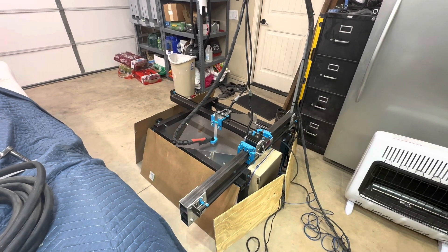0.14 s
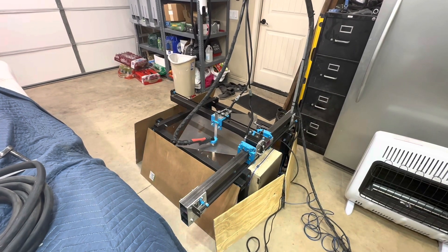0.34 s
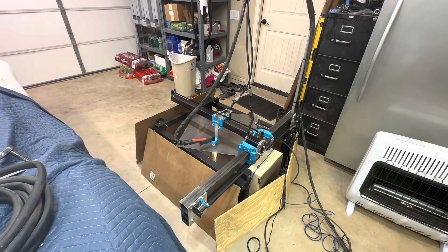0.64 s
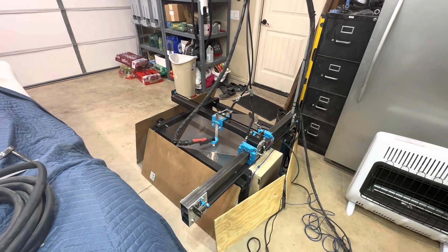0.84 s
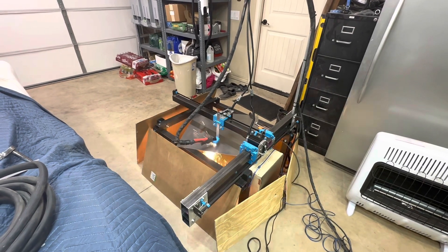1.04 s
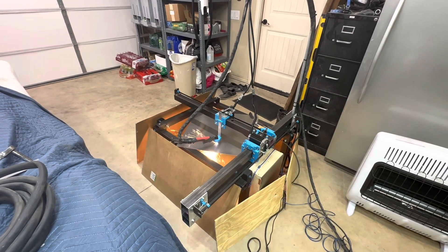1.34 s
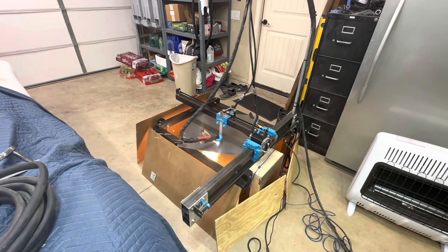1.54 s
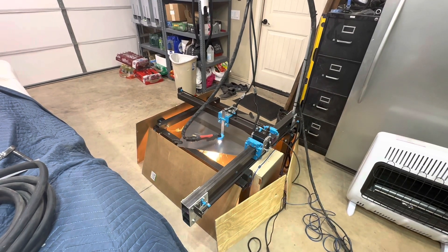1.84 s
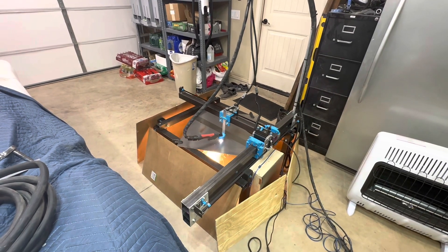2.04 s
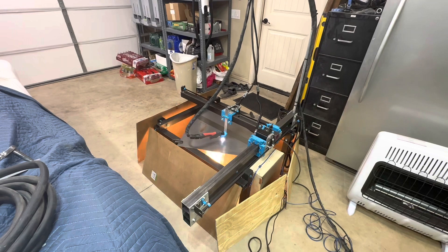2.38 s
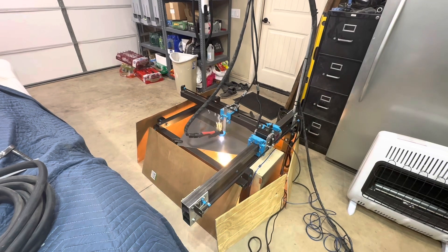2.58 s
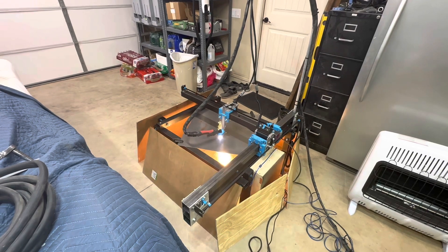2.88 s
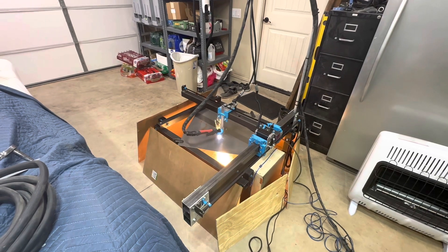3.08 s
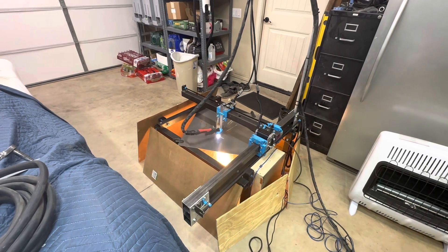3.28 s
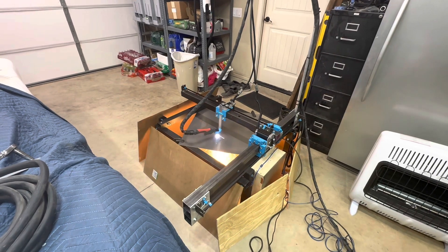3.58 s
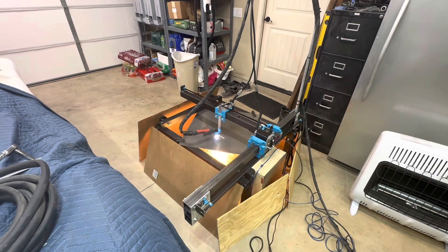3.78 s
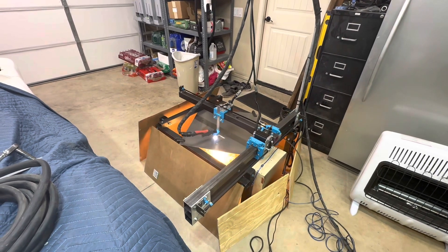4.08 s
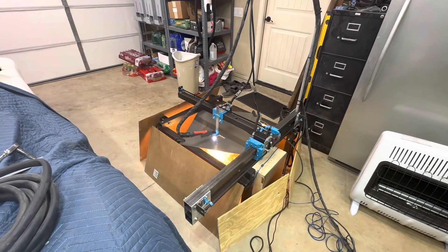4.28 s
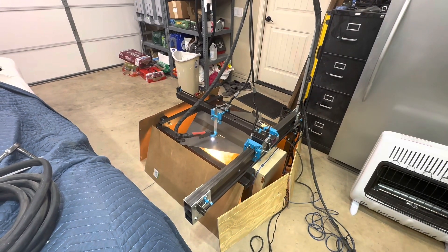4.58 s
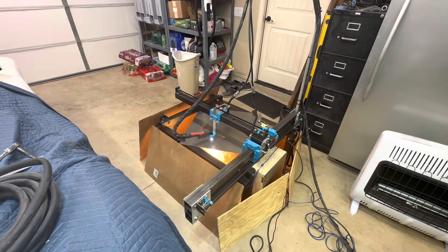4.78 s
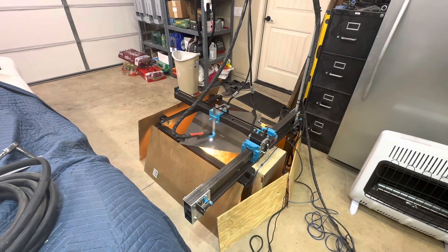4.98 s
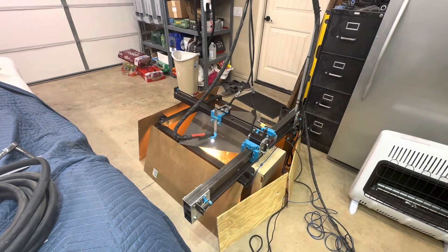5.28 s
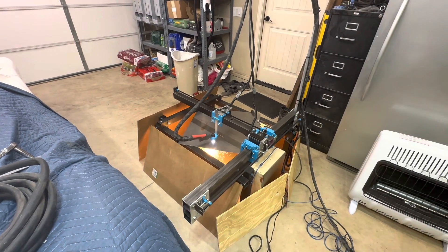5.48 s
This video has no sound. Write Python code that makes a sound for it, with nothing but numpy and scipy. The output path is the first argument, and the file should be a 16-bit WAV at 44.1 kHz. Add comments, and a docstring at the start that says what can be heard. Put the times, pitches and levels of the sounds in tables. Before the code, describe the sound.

In a hard garage, a plasma torch starts with a dull valve thud and a sharp burst of air sinking in pitch. Almost at once a loud, rough, high screech breaks out, slipping and throbbing, then drops and crumbles away within the first second. A broad, bright, steady hiss continues until the end, with faint fan hum below. Stereo microphone a few steps away.

```python
"""A thud and a rush of air, a harsh slipping screech, then a broad steady hiss: a plasma torch in a garage.
The hiss is random short-time spectra shaped in pitch and time; the screech is a tone whose pitch keeps
slipping, with its octave, as the jet meets the whole sheet. The opening valve rings low room modes and sends
noise through the sinking resonance of the hose. The power supply's fan hums underneath as wavering tones.
Two microphone ports hear the hard room, each with its own echoes of the screech."""
import sys
import numpy as np
from scipy import signal
from scipy.fft import rfft, irfft
from scipy.io import wavfile
from scipy.ndimage import uniform_filter1d

SR = 44100
rng = np.random.default_rng(int(sys.argv[2]) if len(sys.argv) > 2 else 0)


def wav_record(signal):
    """Record a signal, one row per channel, as 16-bit PCM in the file named by sys.argv[1]."""
    frames = np.transpose(np.atleast_2d(signal))
    bounded = np.clip(frames, -1, 1)
    # unit amplitude maps onto the largest positive 16-bit level
    quanta = np.round(bounded * 32767).astype(np.int16)
    wavfile.write(sys.argv[1], SR, quanta)


N = 248283

# Relative colour of the air noise, low to middle: pitch_hz, density_db [Hz, dB per Hz]
HISS_COLOUR = [(40, -26), (56, -10.5), (120, -15), (200, -16.5), (360, -12), (450, -19), (485, -6),
               (520, -8), (580, -8.5), (660, -7), (800, -4), (1000, -2), (1400, -0.5), (3100, 0),
               (4600, -0.1), (5000, -1.3), (5350, 0.5), (5900, 2), (6200, 0.7), (6600, -2.6), (7100, -4),
               (8500, -1.5)]
# The same colour, continued to the top: pitch_hz, density_db [Hz, dB per Hz]
TOP_COLOUR = [(9400, -2), (10200, -4), (10900, -.5), (11600, -2.5), (13200, -5.5), (15000, -2.5),
              (16500, -4)]
# Balance of left and right: pitch_hz, left_minus_right_db [Hz, dB]
SIDE_BALANCE = [(60, 0), (250, -1), (1000, 0), (3200, 0), (3800, -2), (4450, -1.5), (5100, 2), (6400, 3.5),
                (7600, 2), (8500, -1), (9400, -5), (10350, 0)]
# Left-right likeness of the hiss over pitch: alike in the bass, opposite near 11 kHz, alike again above:
# pitch_hz, likeness [Hz, -1 to 1]
LEFT_RIGHT_LIKENESS = [(60, .95), (150, .88), (270, .8), (400, .6), (700, .3), (900, .05), (3900, .15),
                       (4900, -.1), (5500, .1), (7700, .25), (9000, -.2), (9800, .2), (10250, -.3),
                       (10450, -1), (12300, -1), (12500, -.5), (12900, .1), (13400, .9), (13900, 1),
                       (15200, .98), (15800, .7)]
# Phase by which one side leads in the bass: pitch_hz, lead_rad [Hz, radians]
SIDE_LEAD = [(130, 0), (260, .3), (520, 1.2), (700, .3)]
ADDED_LIKENESS = .36  # most that is added between left and right, at a random phase for each pitch
SHIFT_S = 1.1  # standing waves change over this time
HOP = 128  # samples between short-time spectra


def jet():
    """Turbulent air: random short-time spectra with patches, broad flutter and the ripple of room modes."""
    frames = N // HOP + 5
    starts = np.arange(frames) * HOP
    t = starts / SR
    f = np.fft.rfftfreq(512, 1 / SR)[:, None]
    a, b, c, d, patches = rng.standard_normal((frames, 257, 5)).T
    left, other = a + 1j * b, c + 1j * d
    patches = uniform_filter1d(patches, size=10, axis=0)
    patches = evened(uniform_filter1d(patches, size=16, axis=1))
    flutter = wander(42)[np.minimum(starts, N - 1)]
    level_db = jet_level(t, f)
    early = np.exp(-t / 0.32)  # the first blast is patchier
    level_db += (1.14 + 1.1 * early) * patches
    level_db += 0.42 * flutter * read([(1000, 0.26), (4000, 0.75)], f)

    same = read(LEFT_RIGHT_LIKENESS, f)
    start, drift = rng.random((len(f), 2, 1)).transpose(1, 0, 2)
    turns = start + (drift - .5) * t / (2 * SHIFT_S)  # the random phase between left and right drifts slowly
    added = ADDED_LIKENESS * (1 - same ** 2) ** 2 * np.exp(2j * np.pi * turns)
    same = same * np.exp(1j * read(SIDE_LEAD, f) * (f < 900)) + added
    right = same * left + np.sqrt(np.maximum(1 - abs(same) ** 2, 0)) * other
    balance_db = np.multiply.outer([.5, -.5], read(SIDE_BALANCE, f))
    spectra = np.array([left, right]) * gain_of(level_db + balance_db)
    sound = signal.istft(spectra, nperseg=512, noverlap=512 - HOP)[1][:, :N]

    fine = np.fft.rfftfreq(N, 1 / SR)
    depth_db = read([(60, 1.1), (400, 3.5), (900, 2.5), (1300, 5.1), (3000, 3.34), (16000, 3.94)], fine)
    coloured = rfft(sound) * gain_of(read(HISS_COLOUR + TOP_COLOUR, fine) - 11.0)
    out = 0
    # standing waves shift: each ripple pattern fades into the next
    for k, ripple in enumerate(rng.standard_normal((7, 1400))):
        ripple_db = depth_db * np.interp(fine, np.arange(1400) * 12., ripple)
        fade = np.maximum(1 - abs(np.arange(N) / SR / SHIFT_S - k), 0)
        out = out + fade * irfft(coloured * gain_of(ripple_db), N)
    return out


# Steady air jet, before its colour: time_s, level_db, added_top_db [s, dB, dB]
STEADY_JET = [(0.03, -37, 11.5), (0.35, -31, 1), (0.62, -33.5, -0.5), (0.75, -33, -1.5), (1.2, -34, -0.5),
              (2.0, -32.5, -1), (2.85, -33, 2), (3.4, -33, 0.5), (4.2, -31.5, -0.5), (4.88, -32.5, -1),
              (5.1, -31.5, -1), (5.63, -31.5, -2)]
# Where the added body applies: pitch_hz, share [Hz, 0 to 1]
BODY_SHARE = [(700, 1), (1000, 0.71), (3500, 0.61), (5200, 0.03)]
BODY_DB, BODY_DIPS = -5, 0.34  # added body, and the share of the background's dip that it follows
# Where the added top applies: pitch_hz, share [Hz, 0 to 1]
TREBLE_SHARE = [(9000, 0.058), (12000, 1)]
# First blast of stored air, before its colour: pitch_hz, level_db, held_until_s [Hz, dB, s]
FIRST_BLAST = [(910, -31, 0.12), (1190, -31, 0.16), (2020, -20.5, 0.05), (2700, -26, 0.076),
               (3600, -23, 0.15), (5000, -23, 0.13), (8700, -26, 0.21), (13000, -29, 0.1)]
BLAST_RISE_S, BLAST_FALL_DB_PER_S = 0.037, 90  # the rise runs on this long after the valve is open
VALVE_S, OPEN_DB_PER_S = 0.0225, 2300  # the air swells at this rate until the valve is open
# Bands of the piercing puff, before its colour: centre_hz, width_hz, level_db [Hz, Hz, dB]
PUFF_BANDS = [(5450, 550, -33), (9000, 2000, -35)]
PUFF_S, PUFF_SPREAD_S = 0.865, 0.081  # its middle, and the time to either side
# Share of the low background wash in the sound: pitch_hz, share [Hz, 0 to 1]
WASH_SHARE = [(700, 0.83), (1000, 0.065)]
WASH_DB = -35.5
# How far the wash follows the background's dip: pitch_hz, share [Hz, 0 to 1]
WASH_DIP_SHARE = [(250, 0.99), (500, 0.62), (800, 0.32)]
# Swell of hum and wash, dipping after the loud start: time_s, level_db [s, dB]
BACKGROUND_SWELL = [(0, 10), (0.2, 6), (0.75, -1), (1.5, -0.5), (2.5, 2), (5.63, 2)]


def jet_level(t, f):
    """dB over pitch and time: steady jet, first blast and piercing puff above the low wash."""
    hiss_db, top_db = played(STEADY_JET, t)
    dip_db, = played(BACKGROUND_SWELL, t)
    body_db = read(BODY_SHARE, f) * (BODY_DB + BODY_DIPS * dip_db)
    steady_db = hiss_db + body_db + read(TREBLE_SHARE, f) * top_db

    hz, blast_db, held_s = np.transpose(FIRST_BLAST)
    falling_s = np.maximum(t - np.interp(f, hz, held_s), 0)
    surge_db = np.interp(f, hz, blast_db) - BLAST_FALL_DB_PER_S * falling_s
    rise = np.clip(t / (VALVE_S + BLAST_RISE_S), 0, 1)

    bands = sum(gain_of(2 * db) * np.exp(-((f - mid_hz) / width) ** 2) for mid_hz, width, db in PUFF_BANDS)
    puff = np.exp(-((t - PUFF_S) / PUFF_SPREAD_S) ** 2) * bands

    power = gain_of(2 * steady_db) + rise * gain_of(2 * surge_db) + puff
    air_db = 10 * np.log10(power) - OPEN_DB_PER_S * np.maximum(VALVE_S - t, 0)
    wash = np.clip(read(WASH_SHARE, f), 0, 1)
    wash_db = WASH_DB + read(WASH_DIP_SHARE, f) * dip_db
    return wash * wash_db + (1 - wash) * air_db


# Screech of the jet on the sheet, calm and rough by turns: time_s, upper_pitch_hz, slip_hz [s, Hz, Hz]
SCREECH_PITCH = [(0.15, 5060, 110), (0.21, 5020, 130), (0.222, 5130, 450), (0.26, 5100, 700),
                 (0.29, 5050, 900), (0.315, 4760, 190), (0.4, 4770, 240), (0.41, 4720, 120),
                 (0.428, 4720, 140), (0.445, 4860, 640), (0.55, 4900, 820), (0.65, 4920, 800),
                 (0.7, 5000, 900), (0.8, 4900, 900)]
# The tone falters or flares: centre_s, half_length_s, change_db [s, s, dB]
SCREECH_FALTERS = [(0.164, 0.017, 1), (0.211, 0.0041, -13), (0.319, 0.014, -8), (0.346, 0.0065, -4),
                   (0.384, 0.018, -6.5), (0.42, .008, -1), (.431, 0.0043, -4), (0.686, 0.0046, -8),
                   (0.742, .01, -9)]
# Brief catches of the tone, levels before the final lift:
# start_s, length_s, upper_pitch_hz, slip_hz, level_db [s, s, Hz, Hz, dB]
TONE_CHIRPS = [(.016, .022, 3080, 150, -33), (.03, .1, 3500, 280, -34), (.06, .11, 5700, 150, -33),
               (.062, .035, 5050, 300, -25), (.742, .038, 4760, 130, -33), (.905, .04, 5080, 280, -33.5),
               (.96, .03, 5050, 500, -40)]
SCREECH_S, ATTACK_S = .151, .007
SCREECH_DB, CALM_DB, CALM_HZ = -20.5, 5, 200  # louder while the slips are small against CALM_HZ
MELT_S, DROP_DB, DROP_S = 0.64, -3.5, 0.036  # it drops as the sheet melts
TAIL_DB_PER_S, TAIL_END_S = 94, 1  # then trails off
RAGGED_DB, RAGGED_S = 2.5, .1  # the tail comes and goes more and more
OCTAVE_S, OCTAVE_OPEN_S = .205, .03  # the octave opens once the tone turns rough
OCTAVE_PURE_DB, OCTAVE_DB, OCTAVE_SAG_DB_PER_S = -22, -8, 4  # levels against the tone
LOWER_S, LOWER_LENGTH_S, LOWER_HZ, LOWER_DB = .157, .085, 4080, -31  # a second, weaker tone


def screech():
    """Feedback between nozzle and sheet: a long screech, brief chirps around it and a weak lower tone."""
    t = np.arange(SR) / SR
    after = np.maximum(t - MELT_S, 0)
    db = SCREECH_DB + DROP_DB * np.minimum(after / DROP_S, 1) - TAIL_DB_PER_S * after
    db += sum(change_db * np.exp(-((t - s) / half) ** 2) for s, half, change_db in SCREECH_FALTERS)
    db += RAGGED_DB * np.minimum(after / RAGGED_S, 1) * wander(40, count=SR)
    gate = np.clip(np.minimum(t - SCREECH_S, TAIL_END_S - t) / ATTACK_S, 0, 1)

    opened = np.clip((t - OCTAVE_S) / OCTAVE_OPEN_S, 0, 1)
    open_db = OCTAVE_DB - OCTAVE_SAG_DB_PER_S * (t - OCTAVE_S)
    octave_db = OCTAVE_PURE_DB + opened * (open_db - OCTAVE_PURE_DB)
    upper_hz, slips = played(SCREECH_PITCH, t)
    level = gain_of(db + CALM_DB * np.exp(-slips / CALM_HZ))
    out = gate * level * slipping(upper_hz, slips, octave_db)

    for s, length, hz, slip, chirp_db in TONE_CHIRPS:
        swell = np.sqrt(abs(arch(t, s, length)))
        out += gain_of(chirp_db) * swell * slipping(hz, slip, OCTAVE_PURE_DB)

    lower_hz = LOWER_HZ + 70 * wander(120, count=SR)
    lower = np.sin(2 * np.pi * np.cumsum(lower_hz) / SR)
    out += gain_of(LOWER_DB) * arch(t, LOWER_S, LOWER_LENGTH_S) * lower
    return np.pad(out, (0, N - SR))


def slipping(hz, slip, octave_db):
    """A tone whose pitch keeps slipping down, with its octave."""
    chance = flicker(300)
    deep = .04 * np.clip(chance, 0, 2.6) ** 2  # now and then a much deeper slip
    slipped_hz = abs(slip) * ((1 + np.tanh(.5 * chance)) / 2 + deep - .04)
    turns = np.cumsum(hz - slipped_hz) / SR
    # the rougher the pitch, the more it throbs
    throb = 1 + np.minimum(abs(slip) / 400, .5) * np.tanh(flicker(170))
    return throb * (np.sin(2 * np.pi * turns) + gain_of(octave_db) * np.sin(4 * np.pi * turns))


# Low modes of the garage rung by the opening valve: pitch_hz, level_db, t60_s [Hz, dB, s]
ROOM_MODES = [(58.5, -44, .3), (94, -34.5, 0.17), (118, -44, 0.28), (177, -41.5, 0.33)]
THUD_S = 0.023
RUSH_START_HZ, RUSH_END_HZ, RUSH_SINK_S = 2270, 890, 0.1  # the hose fills and its hollow rush sinks
RUSH_DB, RUSH_HOLD_S, RUSH_FALL_DB_PER_S = -33, 0.23, 202
DRONE_HZ, DRONE_WIDTH_HZ, DRONE_DB = 697, 72, -46  # a low drone while the sheet is whole
DRONE_S, DRONE_LENGTH_S = 0.14, 0.55


def valve():
    """A low thud, then noise in the sinking resonance of the hose, over a faint drone."""
    t = np.arange(SR) / SR
    age = np.maximum(t - THUD_S, 0)
    hz = RUSH_END_HZ + (RUSH_START_HZ - RUSH_END_HZ) * np.exp(-age / RUSH_SINK_S)
    rush_db = RUSH_DB - RUSH_FALL_DB_PER_S * np.maximum(t - RUSH_HOLD_S, 0)
    rush = np.minimum(age / 0.0053, 1) * gain_of(rush_db) * resonant_noise(hz, 270)
    thud = sum(gain_of(db - 60 * age / t60) * np.sin(2 * np.pi * f * age) for f, db, t60 in ROOM_MODES)
    drone = resonant_noise(np.full(SR, DRONE_HZ), DRONE_WIDTH_HZ)
    drone *= gain_of(DRONE_DB) * arch(t, DRONE_S, DRONE_LENGTH_S)
    return np.pad(rush + thud + drone, ((0, 0), (0, N - SR)))


def resonant_noise(hz, width):
    """One second of noise through a resonance along the curve hz, separate at each port, of rms 1."""
    return np.array([evened(resonate(rng.standard_normal(SR), hz, width)) for _ in range(2)])


def resonate(x, hz, width):
    """Shifts the curve hz down to zero, smooths twice, and shifts back."""
    turn = np.exp(2j * np.pi * np.cumsum(hz) / SR)
    r = np.exp(-np.pi * width / SR)
    once = signal.lfilter([1 - r], [1, -r], x / turn)
    return (turn * signal.lfilter([1 - r], [1, -r], once)).real


# Fan tones, before the background swell: pitch_hz, level_db, waver_hz [Hz, dB, Hz]
FAN_TONES = [(121, -69, 2), (302.3, -55.5, .4), (493, -62.5, 3)]


def fan():
    """Wavering tones of the power supply's fan, a little earlier at one port."""
    t = np.arange(N) / SR
    swell_db, = played(BACKGROUND_SWELL, t)
    out = np.zeros((2, N))
    for hz, db, waver in FAN_TONES:
        phase = 2 * np.pi * (hz * t + np.cumsum(waver * wander(1.71)) / SR + rng.random())
        out += gain_of(db + 1.2 * wander(2)) * np.sin(phase + np.array([[.3], [-.3]]))
    return out * gain_of(swell_db)


def garage(x, t60):
    """Sparse echoes of random sign, other ones at each port, dying evenly."""
    taps = np.zeros((2, SR // 2))
    at = np.arange(100, SR // 2 - 20, 20)
    at = at + rng.integers(0, 20, (2, len(at)))
    np.put_along_axis(taps, at, rng.choice([-1., 1.], at.shape), 1)
    taps *= gain_of(-60 * np.arange(SR // 2) / SR / t60)
    return signal.fftconvolve(x[None], taps / np.linalg.norm(taps[0]), axes=1)[:, :N]


def gain_of(db):
    """Amplitude factor of a level in dB."""
    return 10 ** (np.asarray(db) / 20)


def evened(x):
    """Scales a signal to rms 1."""
    return x / np.sqrt(np.mean(abs(x) ** 2) + 1e-20)


def read(points, hz):
    """Reads a table over pitch, with straight lines on a logarithmic pitch axis."""
    f, value = np.transpose(points)
    return np.interp(np.log(hz + 1), np.log(f + 1), value)


def played(rows, t):
    """Each column of a table as a curve over the times t."""
    s, *columns = np.transpose(rows)
    return [np.interp(t, s, c) for c in columns]


def wander(hz, count=N):
    """Chance of rms 1 with changes up to about hz."""
    return evened(signal.lfilter(*signal.butter(2, min(hz, 5000), fs=SR), rng.standard_normal(count)))


def flicker(hz):
    """One second of quick chance without slow drift."""
    quick = wander(hz, count=SR)
    return evened(quick - uniform_filter1d(quick, size=1200))


def arch(t, start, length):
    """Rises from zero and falls back within length."""
    return np.sin(np.pi * np.clip((t - start) / length, 0, 1))


# One strong echo off the floor, against the direct screech: level_db at the left, then right port [dB]
FLOOR_DB = [-6, -9]
FLOOR_S = 1 / 245
ECHOES_DB, GARAGE_T60_S = -3, .2


def scene():
    """The screech with its floor bounce and echoes at both ports, among jet, valve and fan."""
    tone = screech()
    direct = np.array([tone, np.roll(tone, shift=2)])  # two samples later at the right port
    bounce = gain_of(FLOOR_DB)[:, None] * np.roll(tone, shift=round(FLOOR_S * SR))
    heard = direct + bounce + gain_of(ECHOES_DB) * garage(tone, GARAGE_T60_S)
    balance_db = np.multiply.outer([.5, -.5], read(SIDE_BALANCE, np.fft.rfftfreq(N, 1 / SR)))
    lifted = gain_of(5.5) * irfft(rfft(heard) * gain_of(balance_db), N)
    return lifted + jet() + valve() + fan()


EDGE_HZ = 15880  # upper band limit


def record(dry):
    """The microphone drops the deepest bass and rounds off the highest peaks; then the band limit."""
    dry = signal.sosfilt(signal.butter(4, 45, "high", fs=SR, output="sos"), dry)
    rounded = dry / (1 + (abs(dry) / .85) ** 6) ** (1 / 6)
    lowpass = signal.firwin(1023, EDGE_HZ, window=("kaiser", 9), fs=SR)
    return signal.oaconvolve(rounded, lowpass[None], "same")


dry = scene()
out = record(dry)
wav_record(out)
```